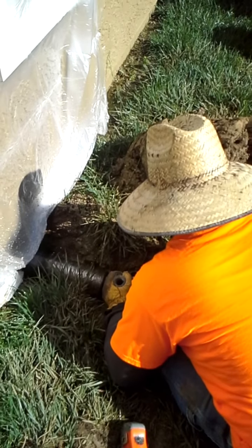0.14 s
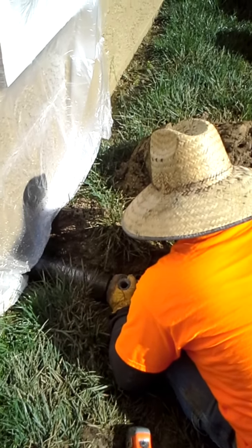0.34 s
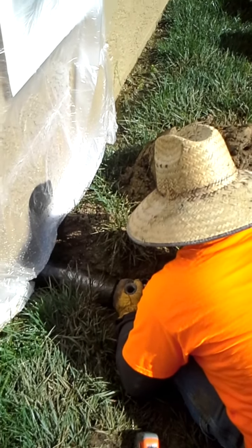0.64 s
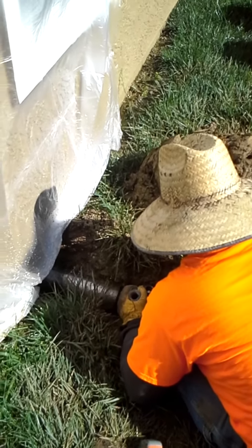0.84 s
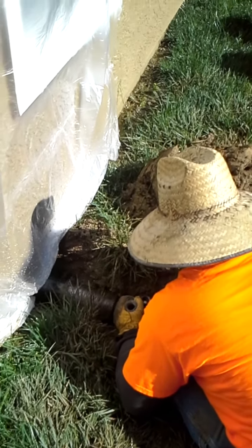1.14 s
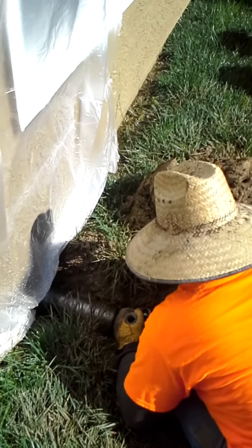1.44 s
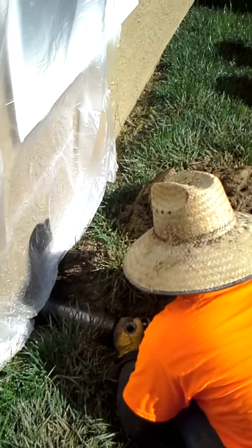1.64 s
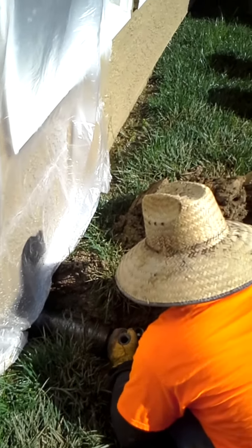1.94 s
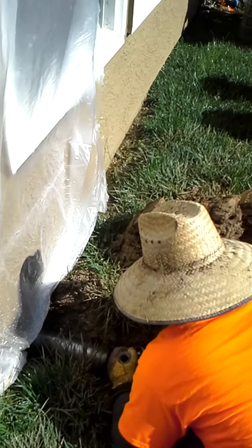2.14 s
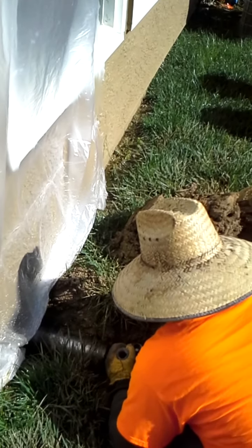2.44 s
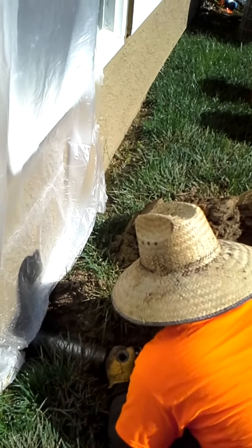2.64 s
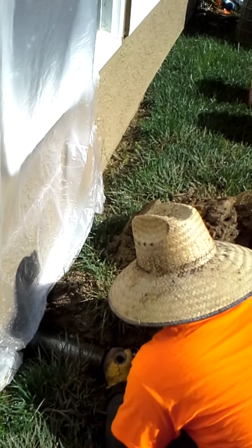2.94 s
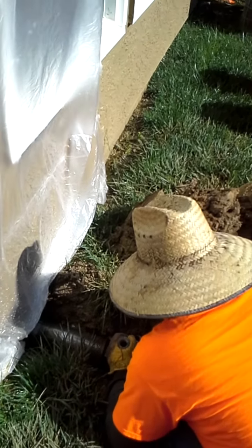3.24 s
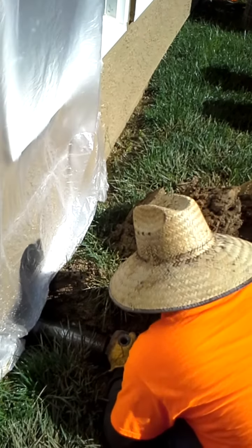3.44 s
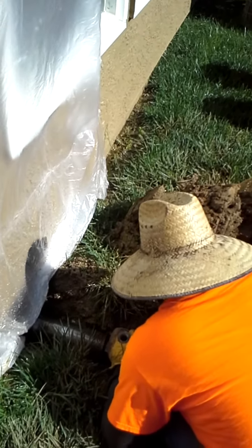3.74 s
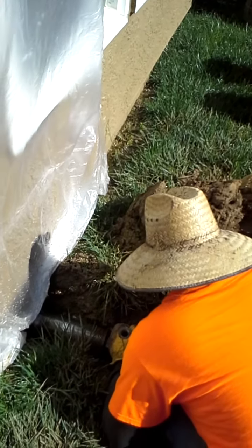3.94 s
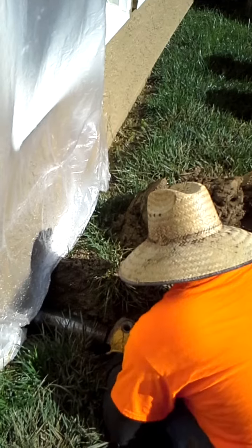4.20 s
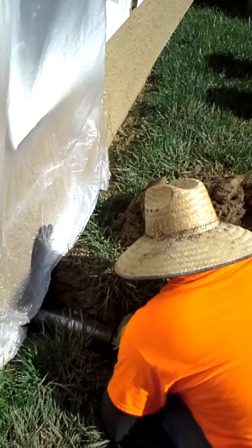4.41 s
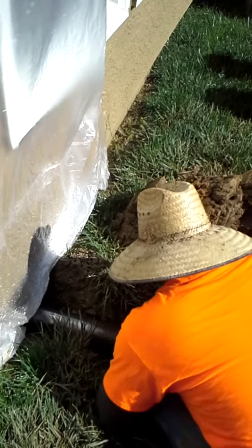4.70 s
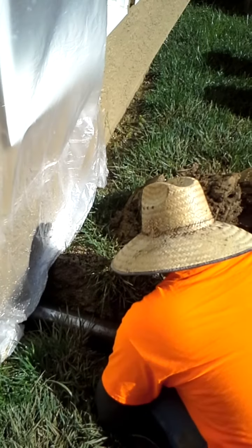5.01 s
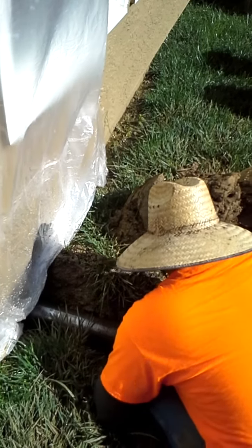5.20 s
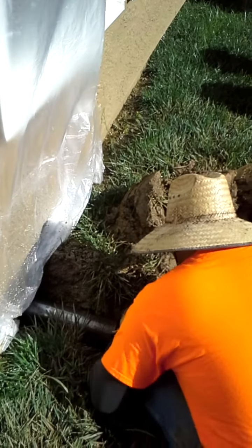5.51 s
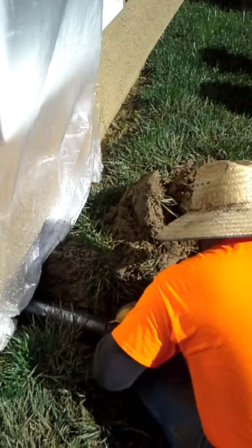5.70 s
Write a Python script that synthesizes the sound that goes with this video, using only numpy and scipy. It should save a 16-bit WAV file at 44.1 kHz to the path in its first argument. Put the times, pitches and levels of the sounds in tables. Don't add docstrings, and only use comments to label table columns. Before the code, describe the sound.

A core drill grinds loudly into concrete with a harsh high whine, seizes abruptly, then a quiet motor hum with metallic scrapes and knocks.

```python
import sys
import numpy as np
from scipy import signal
from scipy.fft import rfft, irfft, next_fast_len
from scipy.io import wavfile
from scipy.ndimage import uniform_filter1d, map_coordinates

SR = 44100
rng = np.random.default_rng(int(sys.argv[2]) if len(sys.argv) > 2 else 0)


def convert_level_to_amplitude(level_db):
    exponent = np.asarray(level_db, float) / 20
    return 10 ** exponent


def generate_wav(sig):
    pcm = np.round(np.clip(np.atleast_2d(sig).T, -1, 1) * 32767).astype(np.int16)
    wavfile.write(sys.argv[1], SR, pcm)


N = 258426

# time in seconds, grinding level in dB.
BITE_LEVEL = [
    (0, -10.5),
    (2, -11),
    (2.55, -11),
    (2.7, -10),
    (2.8, -9.5),
    (2.86, -10),
    (2.915, -11.5),
    (2.938, -12.3),
    (2.946, -18.5),
    (3.11, -32.5),
]
# time in seconds, gear mesh frequency in Hz.
MOTOR_SPEED = [
    (0, 2294),
    (.6, 2283),
    (1.6, 2239),
    (2.5, 2185),
    (2.555, 2150),
    (2.7, 1700),
    (2.862, 1400),
    (2.99, 1000),
]
# frequency in Hz, width in Hz, level in dB.
BARREL_MODES = [(1850, 49, -12), (2450, 67, -5), (2700, 74, -1), (3662, 117, -3.5), (4090, 32, -2),
                (4400, 84, -8), (4700, 163, -2), (5870, 330, -10), (7700, 590, -12.5)]
# frequency in Hz, level in dB per Hz.
SHALLOW_COLOUR = [(710, -54), (1200, -42), (1490, -9.5), (1680, -29), (2160, -4.5), (2220, -9),
                  (2740, -2.5), (3180, -7.5), (4770, -2), (5340, -8.5), (6720, -11.5), (8010, -3.5),
                  (9800, -21), (12700, -55), (21600, -120)]
# frequency in Hz, level in dB per Hz.
DEEP_COLOUR = [(710, -37), (1200, -18), (1650, -20), (1830, -14.5), (2380, -5), (3180, -8), (3510, -6),
               (4250, -6.5), (4640, -1), (5160, -4), (7330, -5), (8290, -17.5), (9800, -15), (12700, -32),
               (21600, -120)]
# frequency in Hz, level in dB per Hz.
STALL_COLOUR = [(260, -54), (450, -28), (575, -32), (646, -10), (846, -15.5), (1440, -2.5), (1630, -8),
                (1760, -2.5), (2810, -2), (3190, -7), (4580, -7), (7480, -7), (9800, -33), (12700, -50),
                (21600, -120)]
# frequency in Hz, level in dB per Hz.
JUDDER_COLOUR = [(18, -73), (30, -45), (55, -29.5), (256, -9), (574, -8.5), (673, -5), (876, -8),
                 (1120, -2), (1650, -6.5), (1830, -1.5), (2000, -6), (2600, -12), (4400, -120)]
# frequency in Hz, level in dB per Hz.
DUST_COLOUR = [(6000, -22.5), (8500, -1), (9900, -5.5), (10600, 5), (11500, 0), (13000, 0.5), (14500, -3.5),
               (16000, -1.5)]
# frequency in Hz, width in Hz, gain in dB.
HOUSING_MODES = [(2130, 60, 8), (1850, 75, 14)]
# time in seconds, frequency in Hz, level in dB.
FLARES = [(.202, 674, -37), (.721, 680, -31.5), (.35, 1086, -32), (.55, 680, -36), (.81, 1105, -25),
          (.984, 684, -34), (1.067, 1105, -25.5), (1.136, 1090, -25.5), (1.278, 2725, -14),
          (2.63, 4060, -15), (2.83, 2810, -15), (2.853, 5100, -15), (2.862, 1470, -18.5),
          (2.862, 3050, -21), (2.884, 2600, -21), (2.911, 2760, -18), (2.936, 5080, -8), (2.962, 1112, -26),
          (2.85, 672, -28.5), (2.95, 670, -27), (4.38, 2880, -19), (4.385, 4700, -21), (4.395, 4700, -19),
          (4.435, 4700, -25), (4.698, 2496, -15), (4.71, 4600, -19), (4.722, 4300, -24),
          (5.034, 2476, -16.5)]
# start in seconds, level in dB, loudest band in Hz, length in seconds.
STROKES = [(2.79, -16, 4600, .0066), (2.823, -11, 6000, .015), (2.93, -7, 5000, 0.009),
           (2.952, -21, 720, .03), (3.234, -32, 1800, .021), (4.348, -23.5, 4600, 0.019),
           (4.373, -12, 2830, 0.016), (4.387, -15.5, 2860, .018), (4.4, -16.5, 6100, 0.022),
           (4.426, -21, 2880, .02), (4.446, -22, 2450, .022), (4.655, -26, 1850, 0.029),
           (4.674, -16.5, 4820, 0.018), (4.686, -13, 2470, .014), (4.7, -8, 2540, 0.015),
           (4.713, -11.5, 4500, 0.015), (4.729, -14, 4400, .016), (5.018, -22, 3300, .007)]
# start in seconds, peak in dB, click centre in Hz, T60 in seconds.
FREE_KNOCKS = [
    (4.689, -8.5, 1280, 0.051),
    (4.7124, -3, 8300, 0.028),
    (4.7264, 0.5, 2300, .035),
    (4.7506, 0, 2300, 0.096),
]
# start in seconds, peak in dB, click centre in Hz, T60 in seconds.
HELD_TICKS = [
    (4.1175, -28, 1710, .04),
    (4.3735, -5, 2870, .03),
    (4.5404, -20, 2780, .02),
    (4.558, -16, 2700, .02),
    (5.025, 2, 6460, 0.029),
    (5.029, -11, 5240, 0.11),
    (5.2526, -20, 2400, .03),
    (5.4256, -17, 7400, .02),
    (5.4296, -10.5, 7400, 0.029),
]
# start in seconds, peak in dB, click centre in Hz, T60 in seconds.
GRIT_SNAPS = [
    (2.933, -4, 5000, .02),
    (4.5162, -14, 8050, .02),
    (5.587, -9.5, 7900, .012),
]
# frequency in Hz, level in dB, T60 in seconds.
FREE_MODES = [(673, -5, 0.2), (1261, -0.5, 0.29), (1832, -8, 0.27), (2183, 1, 0.3), (2700, -6, 0.2),
              (3870, -9, 0.22), (5297, -8, 0.12)]
# frequency in Hz, width in Hz, level in dB.
SEATED_MODES = [(2610, 150, 3), (4740, 580, -1.5), (6100, 770, -4), (7400, 150, -9)]
# frequency in Hz, level in dB per Hz.
PUMP_COLOUR = [(60, -27), (165, -18.5), (400, -14), (572, -8), (850, -12), (1180, -9), (1680, -1.5),
               (2460, -3), (3400, -9.5), (5600, -11), (7300, -5.5), (9300, -16.5), (12500, -17),
               (16000, -21)]
# multiple of the shaft frequency, level in dB.
PUMP_TONES = [(9.5, -52.5), (9.96, -50), (17, -48.5), (22, -47.5), (24, -49.5), (30, -43), (36, -42),
              (41, -48), (45, -48.5), (50, -50), (66, -53), (70, -50), (75, -49), (85, -54)]
# frequency in Hz, level in dB per Hz.
BREEZE_COLOUR = [(15, -8), (40, -1.5), (90, -4.5), (160, 0), (300, -24)]

SWITCH_OFF_S, HALT_S = 2.53, 2.92
HALT_IN_S = 0.018
TIME = np.arange(N) / SR


def unit(x):
    return x / np.sqrt(np.mean(x ** 2) + 1e-20)


def along(points, hz):
    f, v = np.transpose(points)
    return np.interp(np.log(hz + 1), np.log(f + 1), v)


def curve(rows):
    s, value = np.transpose(rows)
    return np.interp(TIME, s, value)


def ramp(start, length):
    return np.clip((TIME - start) / length, 0, 1)


def wobble(rate):
    knots = rng.standard_normal(int(N * rate / SR) + 4)
    return map_coordinates(knots, [np.arange(N) * rate / SR])


def tone(cycles):
    return np.sin(2 * np.pi * cycles)


def filtered(x, response):
    m = next_fast_len(N + SR // 2)
    return irfft(rfft(x, m) * response(np.fft.rfftfreq(m, 1 / SR)), m)[:N]


def coloured(x, spectrum):
    return unit(filtered(x, lambda hz: convert_level_to_amplitude(along(spectrum, hz))))


def resonances(modes, hz):
    return sum(convert_level_to_amplitude(db) * 1j * hz * w / (c * c - hz * hz + 1j * hz * w) for c, w, db in modes)


def grit(lumpy_db, rate):
    return rng.standard_normal(N) * convert_level_to_amplitude(lumpy_db * wobble(rate))


def patchy(x, patchy_db):
    z = signal.stft(x, nperseg=512)[2]
    across_hz = uniform_filter1d(rng.standard_normal(z.shape), 4, 0)
    field = uniform_filter1d(across_hz, 7, 1)
    return signal.istft(z * convert_level_to_amplitude(patchy_db * unit(field)), nperseg=512)[1][:N]


def drill():
    mesh_hz = curve(MOTOR_SPEED)
    sag = mesh_hz.max() - mesh_hz
    slow = 1 - mesh_hz / mesh_hz.max()
    teeth_per_turn = 133
    turn = np.cumsum(mesh_hz) / SR / teeth_per_turn + 0.352
    coast, halt = ramp(SWITCH_OFF_S, 0.31), ramp(HALT_S, HALT_IN_S)
    strain = np.clip((sag - 44) / 45, 0, 1) * (1 - coast)
    bite = convert_level_to_amplitude(0.22 * tone(turn) + 0.17 * wobble(11.1) + 2.4 * slow * wobble(70))
    cutting = grind(slow) + judder(strain, coast, halt) + dust(turn, slow, strain, halt)
    running = np.clip((3.12 - TIME) / .04, 0, 1)
    return running * (convert_level_to_amplitude(curve(BITE_LEVEL)) * bite * cutting + whine(mesh_hz, sag, slow) + squeal(turn, sag))


def grind(slow):
    rung = filtered(patchy(grit(1.2, 600), patchy_db=1.1), lambda hz: .6 + resonances(BARREL_MODES, hz))
    depth = np.clip(TIME / 1.6, 0, 1)
    turning = unit((1 - depth) * coloured(rung, SHALLOW_COLOUR) + depth * coloured(rung, DEEP_COLOUR))
    dragging = coloured(grit(3.0, 250) + .5 * unit(rung), STALL_COLOUR)
    stall = np.clip(2.8 * slow - .4, 0, .65)
    return (1 - stall) * turning + stall * dragging


def judder(strain, coast, halt):
    level_db = -17.5 + 2.5 * strain - 5.5 * coast + 13.5 * halt
    return convert_level_to_amplitude(level_db + 0.9 * wobble(20)) * coloured(grit(2.4, 200), JUDDER_COLOUR)


def dust(turn, slow, strain, halt):
    level_db = -11.5 + 3.5 * strain + 2.5 * halt
    hiss = convert_level_to_amplitude(level_db + 0.54 * np.sin(2 * np.pi * turn + 0.74)) * coloured(grit(2.0, 900), DUST_COLOUR)
    finest = filtered(hiss, lambda hz: 1 / (1 + (12200 / (hz + 1)) ** 8))
    return hiss + finest * (convert_level_to_amplitude(2 - 1.5 * TIME - 10 * slow) - 1)


def whine(mesh_hz, sag, slow):
    lit_db = sum(db * np.exp(-((mesh_hz - hz) / w) ** 2) for hz, w, db in HOUSING_MODES)
    driven_db = -23.5 - .115 * sag
    idle_db = -28.5 - .013 * sag + lit_db
    level_db = np.where(TIME < SWITCH_OFF_S, driven_db, idle_db)
    mesh = np.cumsum(mesh_hz + (14 + 25 * slow) * wobble(45)) / SR
    return convert_level_to_amplitude(level_db + 3.5 + 2 * wobble(30)) * tone(mesh) * (TIME < 2.99)


def squeal(turn, sag):
    fade_db = 300 * np.maximum(TIME - SWITCH_OFF_S, 0)
    level_db = -32.7 - .025 * sag - fade_db
    throb_db = np.minimum(1.7 + .06 * sag, 5.5)
    drag = convert_level_to_amplitude(throb_db * np.cos(2 * np.pi * turn - .2) + 1.2 * wobble(40))
    sweep_hz = (45 + 10 * throb_db) * tone(turn) + 35 * wobble(90)
    pitch_hz = 10950 - 3.05 * sag
    return convert_level_to_amplitude(level_db + 6) * drag * tone(np.cumsum(pitch_hz + sweep_hz) / SR)


def chatter():
    out, t = np.zeros(N + SR), np.arange(-SR // 8, SR // 8) / SR
    flare_cycles = 14
    for s, hz, db in FLARES:
        swell = np.exp(-(t * hz / flare_cycles) ** 2)
        out[round((s + t[0]) * SR):][:len(t)] += convert_level_to_amplitude(db + 2.5) * swell * tone(hz * t)
    return out[:N]


def barrel():
    out, t = np.zeros(N + SR), np.arange(SR // 3) / SR
    for s, db, centre_hz, length in STROKES:
        out[round(s * SR):][:len(t)] += convert_level_to_amplitude(db) * scrape(t, db, centre_hz, length)
    # events, ring level in dB, dry crack level in dB
    for rows, ring_db, crack_db in [(FREE_KNOCKS, -5.8, -21), (HELD_TICKS, -28, -21), (GRIT_SNAPS, -28, -4)]:
        for s, db, centre_hz, t60 in rows:
            out[round(s * SR):][:len(t)] += convert_level_to_amplitude(db - 8.5) * knock(t, centre_hz, t60, ring_db, crack_db)
    return out[:N]


def scrape(t, db, centre_hz, length):
    dust_db = -24 - .25 * db
    grip = (1 - np.exp(-t / .001)) * convert_level_to_amplitude(-4 * t / length)
    release = np.exp(-(t / length) ** 4) + 0.033 * convert_level_to_amplitude(-60 * t / 0.13)
    return grip * release * contact(centre_hz, dust_db, grain_db=3, size=len(t))


def knock(t, centre_hz, t60, ring_db, crack_db):
    decay = convert_level_to_amplitude(-60 * t / max(t60, .004)) + 0.058 * convert_level_to_amplitude(-60 * t / 0.39)
    click = decay * (1 - np.exp(-t / 0.0005)) * contact(centre_hz, crack_db, grain_db=0, size=len(t))
    ring = sum(convert_level_to_amplitude(level + rng.normal(0, 0.8) - 60 * t / life) * tone(f * t) for f, level, life in FREE_MODES)
    return click + convert_level_to_amplitude(ring_db) * ring * (1 - np.exp(-t / 0.0017))


def contact(centre_hz, dust_db, grain_db, size):
    hz = np.fft.rfftfreq(size, 1 / SR)
    grains = convert_level_to_amplitude(grain_db * uniform_filter1d(rng.standard_normal(size), 40) * np.sqrt(40))
    rub, dry = rfft(grains * rng.standard_normal((2, size)))
    body = 0.57 * along([(300, 0.055), (700, 0.99), (8000, 1.0), (10000, 0.056)], hz)
    band = body + resonances(SEATED_MODES, hz) + resonances([(centre_hz, 320, 8)], hz)
    return unit(irfft(rub * band, size)) + convert_level_to_amplitude(dust_db) * unit(irfft(dry * (hz > 8000), size))


def thump():
    start_s, length_s = 4.716, .006
    u = (TIME - start_s) / length_s
    return convert_level_to_amplitude(-30) * np.exp(-u ** 2) * (1 + np.tanh(3 * u))


def background_db():
    peak_s, period_s = 4.74, 2.14
    swell = 0.62 * np.cos(2 * np.pi * (TIME - peak_s) / period_s)
    back = ramp(HALT_S, 0.2)
    return -27 + back * swell - (1 - back) * 3.5


def pump():
    shaft_hz = 58.9
    air = convert_level_to_amplitude(.3 * wobble(12)) * coloured(patchy(grit(1, 300), patchy_db=.9), PUMP_COLOUR)
    frame = [(78, 30, 0)]  # Hz, width Hz, dB
    drone = unit(filtered(rng.standard_normal(N), lambda hz: resonances(frame, hz) ** 2))
    drift = TIME + 2.5e-5 * wobble(2.92)
    orders = np.zeros(N)
    for multiple, db in PUMP_TONES:
        waver = np.interp(TIME, np.linspace(0, N / SR, 30), convert_level_to_amplitude(1.8 * rng.standard_normal(30)))
        orders += convert_level_to_amplitude(db + 1.5) * waver * tone(multiple * shaft_hz * drift + rng.random())
    return convert_level_to_amplitude(background_db()) * (air + convert_level_to_amplitude(-31) * drone) + orders


def breeze():
    lumps = convert_level_to_amplitude(4.5 * wobble(9) + background_db())
    return convert_level_to_amplitude(-57.0) * unit(lumps * coloured(rng.standard_normal(N), BREEZE_COLOUR))


def scene():
    return (drill() + chatter() + pump() + barrel() + thump() + breeze())[None] * [[1], [1]]


def starved(x):
    bass = filtered(x, lambda hz: 1 / (1 + (hz / 160) ** 8))
    gap_db = np.minimum(16 * (wobble(14) - .5), 3) * (1 - ramp(HALT_S, HALT_IN_S))
    return x + bass * (convert_level_to_amplitude(gap_db) - 1)


def top_cut(x):
    return signal.sosfilt(signal.butter(12, 17090, fs=SR, output="sos"), x)


def record(dry):
    ceiling, bass_cut_hz, top_hz = 0.71, 110, 15740
    held = dry[0] / (1 + np.abs(dry[0] / ceiling) ** 5) ** (1 / 5)
    kept = filtered(starved(held), lambda hz: (hz < top_hz) * (1j * hz / (bass_cut_hz + 1j * hz)) ** 2)
    return top_cut(np.array([kept, kept]))


dry = scene()
out = record(dry)
generate_wav(out)
```